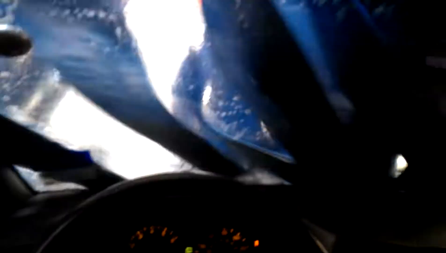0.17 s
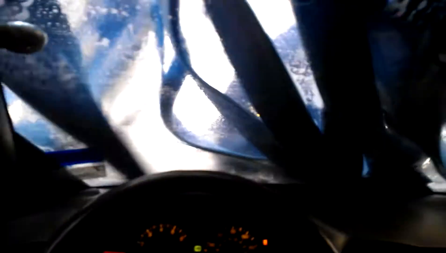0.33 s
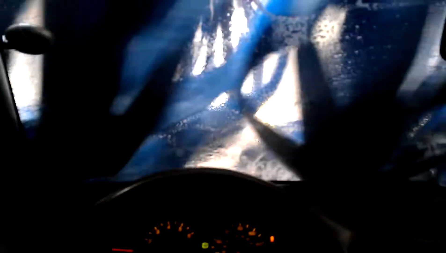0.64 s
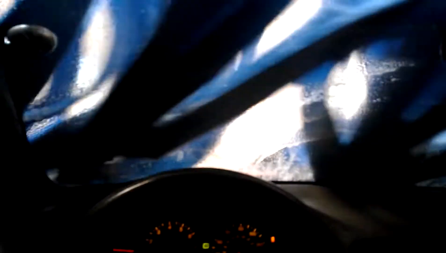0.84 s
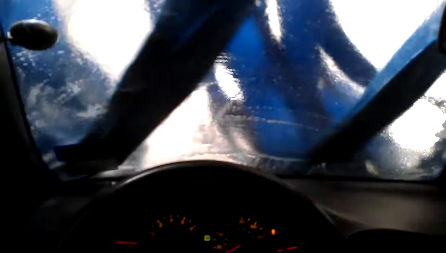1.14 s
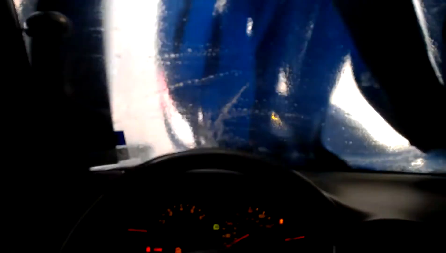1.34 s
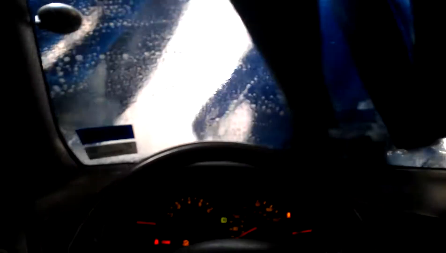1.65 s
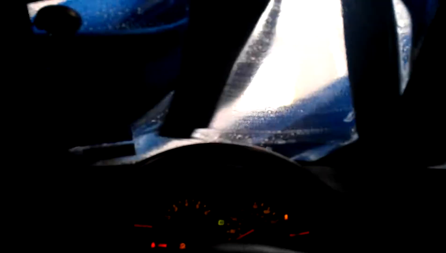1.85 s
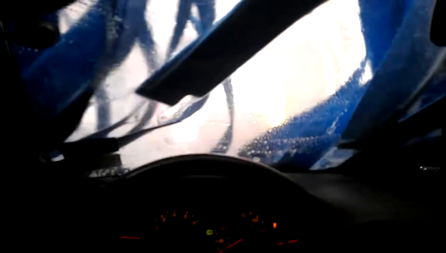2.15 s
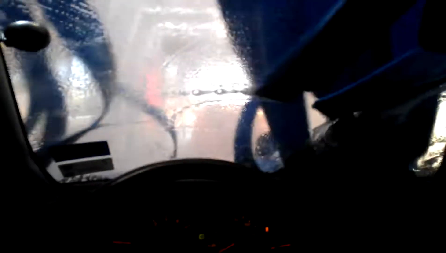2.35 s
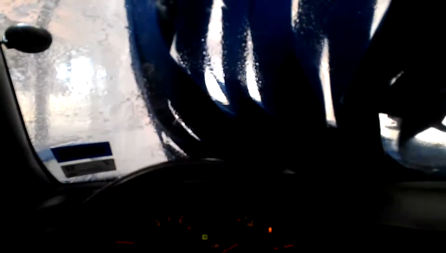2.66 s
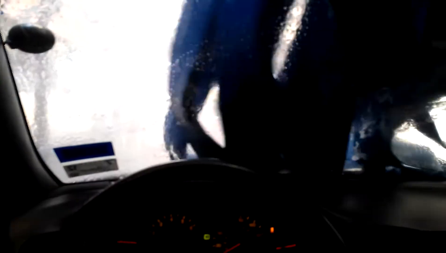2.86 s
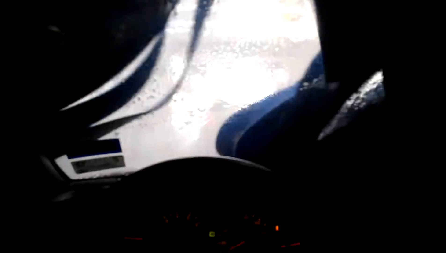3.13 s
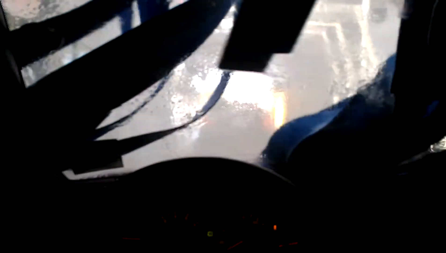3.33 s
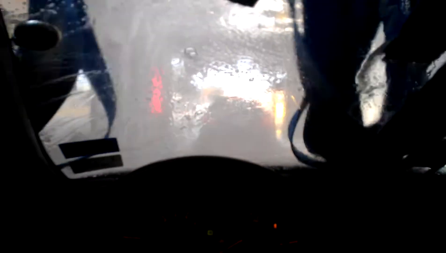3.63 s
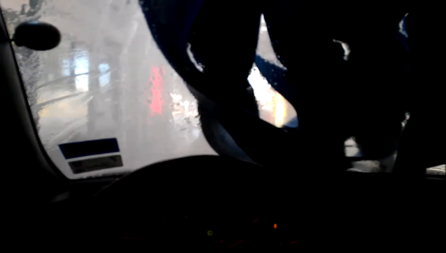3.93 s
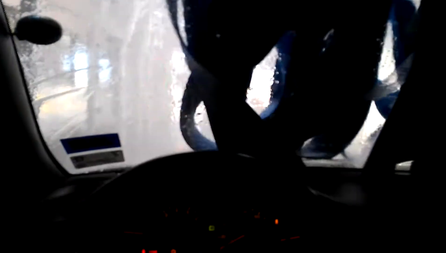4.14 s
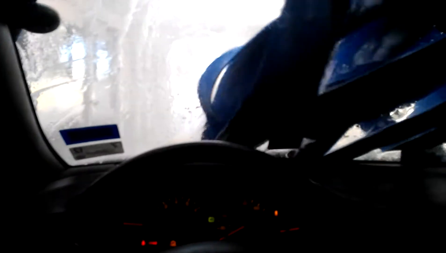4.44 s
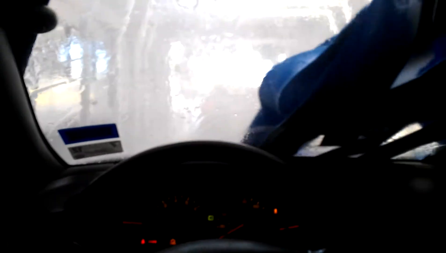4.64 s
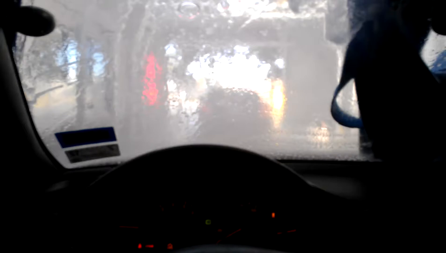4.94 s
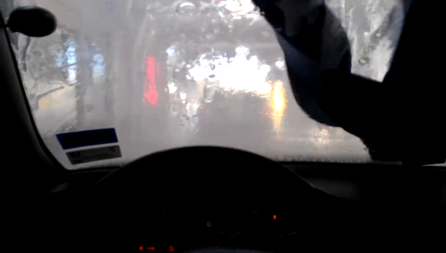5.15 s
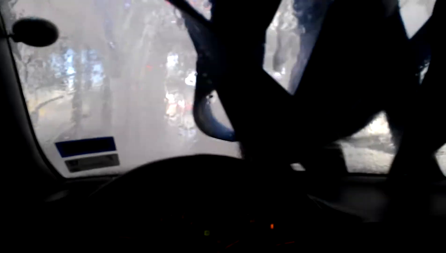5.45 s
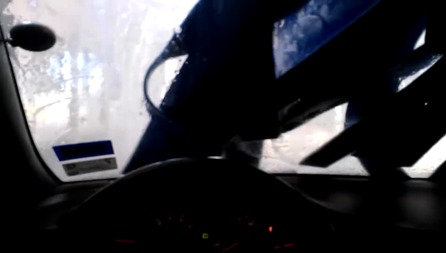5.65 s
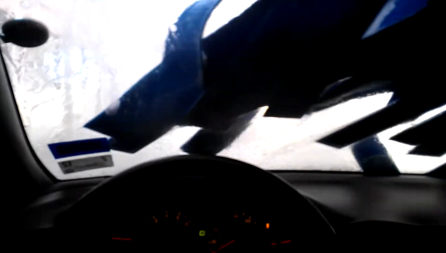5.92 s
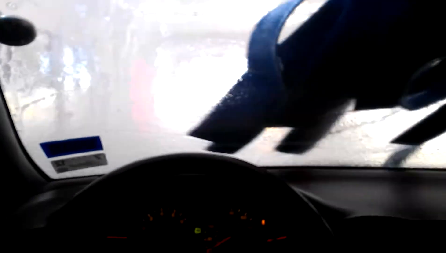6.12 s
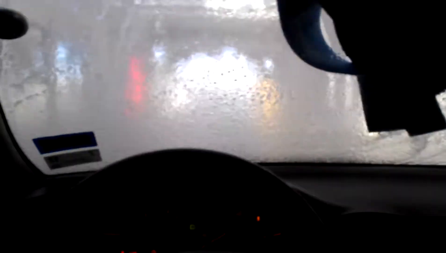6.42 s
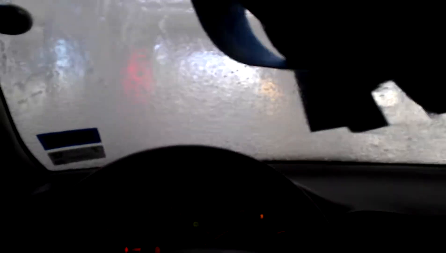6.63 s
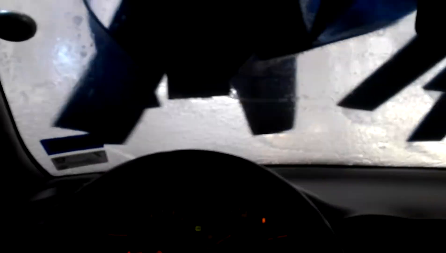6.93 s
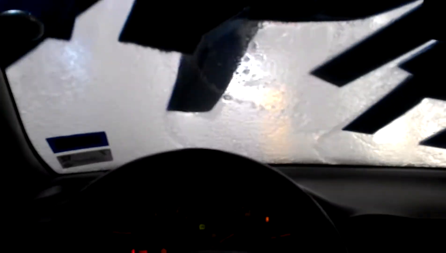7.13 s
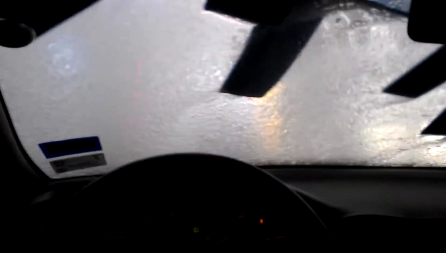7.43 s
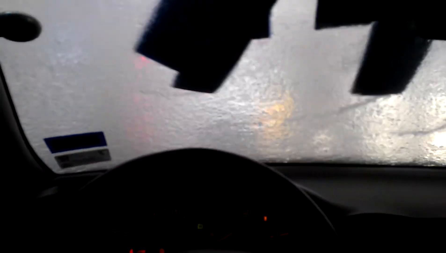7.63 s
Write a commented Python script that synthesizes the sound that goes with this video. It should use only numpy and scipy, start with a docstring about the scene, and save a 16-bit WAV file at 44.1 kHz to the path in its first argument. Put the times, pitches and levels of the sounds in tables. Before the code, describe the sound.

From the driver's seat in a tunnel car wash, wet cloth strips scrub and swish over panels and glass while fine spray hisses. Slaps start sparse and muffled, then crowd into hard, splashy blows near two and three seconds. Short squeaks skid on the glass. Later hits are looser and spray grows. A small recorder inside the cabin overloads and ducks on the hardest blows.

```python
"""Heavy wet slaps land all around the driver's seat in a tunnel car wash, over scrubbing, swish and spray.
Each slap is noise drumming on the car, a ringing struck spot and a burst of squeezed water.
Coloured grainy noise makes the cloth and water; gliding noise bands squeak, sagging low sines thud.
The hardest slaps overload the small recorder, whose gain ducks and creeps back."""
import sys
import numpy as np
from scipy import signal
from scipy.fft import rfft, irfft, next_fast_len
from scipy.io import wavfile
from scipy.ndimage import uniform_filter1d, map_coordinates

SR = 44100
rng = np.random.default_rng(int(sys.argv[2]) if len(sys.argv) > 2 else 0)


def inscribe(sig):
    """Save sig as 16-bit PCM at rate SR to the path in sys.argv[1].

    A 1-D sig is mono; a 2-D sig holds one channel per row.
    Samples are clipped to [-1, 1] before scaling.
    """
    pcm = np.round(np.clip(np.atleast_2d(sig).T, -1, 1) * 32767)
    wavfile.write(sys.argv[1], SR, pcm.astype(np.int16))


N = 343098

# the curtain's slow pressure on the car and the water it carries:
# (time [s], scrubbing level [dB], wet swish level [dB], spray level before its 2 dB lift [dB])
CURTAIN_LEVELS = [(0, -18, -20, -25.5), (.2, -22.5, -25, -31), (.6, -18.5, -26.5, -30),
                  (.8, -22, -27, -33.5), (1.2, -17.5, -26.5, -34), (1.45, -19, -29, -37.5),
                  (1.75, -15, -22, -34.5), (2.25, -21, -28, -42), (2.9, -16.5, -24, -37.5),
                  (3.6, -16.5, -24, -38.5), (4.5, -16, -22, -35.5), (5.4, -20, -24.5, -37),
                  (5.8, -20, -19.5, -33.5), (6.05, -18, -18.5, -28.5), (6.7, -21, -20, -27),
                  (7.15, -20.5, -20.5, -29.5), (7.45, -21.5, -18.5, -26.5), (7.78, -21, -21, -23.5)]


def amp(db):
    """Decibels to gain."""
    return 10 ** (np.asarray(db) / 20)


def unit(x):
    """Scale to rms 1."""
    return x / np.sqrt(np.mean(x ** 2) + 1e-20)


def along(points, hz):
    """(frequency [Hz], value) points read on a log frequency axis."""
    f, v = np.transpose(points)
    return np.interp(np.log(hz + 1), np.log(f + 1), v)


def curves(rows):
    """One value per sample for each column after the time."""
    s, *cols = np.transpose(rows)
    return [np.interp(np.arange(N) / SR, s, c) for c in cols]


def wobble(rate):
    """A smooth random curve, rate knots a second."""
    knots = rng.standard_normal(int(N * rate / SR) + 4)
    return map_coordinates(knots, [np.arange(N) * rate / SR])


def bump(hz, centre, width):
    """Bell shape of a resonance, 1 at its centre and 1/2 at the edges of its width."""
    return 1 / (1 + (2 * (hz - centre) / width) ** 2)


def cabin(hz):
    """Lift in dB that the resonances of the panels and the cabin give each frequency."""
    # resonances of panels and cabin: (frequency [Hz], width [Hz], lift [dB])
    resonances = [(256, 40, 2.5), (363.2, 94, 7.5), (527.6, 54, 7.5), (782, 244, 8), (1030, 102, 7),
                  (1876, 130, 22)]
    return sum(db * bump(hz, centre, width) for centre, width, db in resonances)


def heard(pair, colour):
    """Two unrelated drives ring through a causal colour (dB of Hz), reach two ports, mid at rms 1."""
    # likeness of the two microphone ports: (frequency [Hz], likeness [clipped to -1..1])
    port_likeness = [(100, 1.6), (300, 0.67), (600, 0.87), (1100, 0.2), (2500, 0.15), (8000, 0.34)]
    # tilt between the ports: (frequency [Hz], left minus right [dB])
    port_lean = [(60, 2.7), (110, 6.5), (190, 7), (330, 3.3), (590, 8.2), (1040, 5.1), (1830, 2.7),
                 (3240, 7.2), (5720, 6.1), (10100, 6.2)]
    n = pair.shape[1]
    m = 2 * next_fast_len(n // 2 + 4096)
    hz = np.fft.rfftfreq(m, 1 / SR)

    # folding the cepstrum makes the colour minimum-phase: nothing rings ahead of its drive
    cepstrum = irfft(np.log(amp(colour(hz)) + 1e-6))
    cepstrum[1:m // 2] *= 2
    cepstrum[m // 2 + 1:] = 0
    response = np.exp(rfft(cepstrum))

    # the balance of mid and side sets the likeness
    turn = np.arccos(np.clip(along(port_likeness, hz), -1, 1)) / 2
    mid, side = rfft(pair, m) * response * [np.cos(turn), np.sin(turn)]
    lean = amp(along(port_lean, hz) / 2)
    ports = irfft([(mid + side) * lean, (mid - side) / lean], m)[:, :n]
    return ports / np.sqrt(np.mean(ports.mean(0) ** 2) + 1e-20)


def grains(rate, spread_db, share):
    """Tiny contacts, rate a second, of uneven size over smooth noise; share is their part of the power."""
    sizes = amp(spread_db * np.clip(rng.standard_normal(N), -2, 2))
    ticks = (rng.random(N) < rate / SR) * sizes
    ticks = unit(ticks * rng.standard_normal((2, N)))
    smooth = rng.standard_normal((2, N))
    share = np.clip(share, 0, 1)
    return np.sqrt(share) * ticks + np.sqrt(1 - share) * smooth


def patchy(pair, depth_db):
    """The colour shifts from moment to moment as the contact wanders."""
    z = signal.stft(pair, nperseg=512)[2]
    field = rng.standard_normal(z.shape[1:])
    field = uniform_filter1d(field, size=7, axis=0)  # blur over frequency
    field = uniform_filter1d(field, size=10, axis=1)  # blur over time
    return signal.istft(z * amp(depth_db * unit(field)), nperseg=512)[1][:, :N]


def wipes():
    """Lift in dB as bundles of strips wipe across the car, each a smooth bell-shaped swell."""
    # passing bundles: (time at the height [s], width at 61 % of the lift [s], lift [dB])
    swells = [(0.408, 0.096, 3.5), (1.14, 0.088, 2.5), (2.46, 0.16, 4.5), (4.774, 0.042, 5),
              (6.635, 0.075, 1.5), (7.342, 0.088, 4)]
    t = np.arange(N) / SR
    return sum(db * np.exp(-2 * ((t - s) / length) ** 2) for s, length, db in swells)


def water():
    """Fine drops spatter on the windscreen; a jet adds a narrow, wavering hiss and fades as it is passed."""
    # spectrum shape of the spray: (frequency [Hz], density [dB per Hz])
    spray_shape = [(60, -59), (2500, -6), (4200, 1.5), (5200, 2.5), (6200, 4), (7800, -1), (8900, 3),
                   (9700, -4.5), (10500, -18), (11300, -51)]
    # jet on the glass, fading as the car rolls past it: (time [s], level [dB])
    jet_levels = [(0, -24), (.2, -29.5), (.45, -26.5), (.9, -36), (1.8, -35), (2.3, -58), (7.78, -73)]
    spray_db = curves(CURTAIN_LEVELS)[2] + .5 * wipes()
    jet_db = curves(jet_levels)[0]

    def spray_colour(hz):
        return along(spray_shape, hz)

    def jet_colour(hz):
        nozzle = bump(hz, 3770, 240) + 0.35 * bump(hz, 4400, 700)
        return along(spray_shape, hz) + 20 * np.log10(nozzle)

    spray = heard(grains(rate=2000, spread_db=-4.5, share=0.15), spray_colour)
    jet = heard(patchy(rng.standard_normal((2, N)), depth_db=2.5), jet_colour)
    spray = spray * amp(spray_db + 2.0 + 1.32 * wobble(30))
    return spray + jet * amp(jet_db + 2.6 * wobble(16.0))


def flaps():
    """Strip ends flutter unevenly, rms 1: random catches with a quick rise and a slower fall."""
    flaps_per_s, rise_s, decay_s = 40, 0.0013, 0.064
    flutter = (rng.random(N) < flaps_per_s / SR) * rng.uniform(0.24, 1, N)
    flutter = flutter - flutter.mean()
    for seconds in (rise_s, decay_s):
        flutter = signal.lfilter([1], [1, -np.exp(-1 / (seconds * SR))], flutter)
    return unit(flutter)


def cloth():
    """Cloth sticks and slips on the panels as grainy noise; its wet face swishes over the glass."""
    # spectrum shapes of scrubbing and of wet swish: (frequency [Hz], density [dB per Hz])
    scrub_shape = [(25, -69), (70, -52), (110, -36), (160, -21.5), (220, -12), (260, -1.5), (330, 0),
                   (460, 2.5), (630, -2), (950, -3), (1200, -9), (1600, -18.5), (3500, -76.5)]
    swish_shape = [(60, -64), (500, -9), (1100, 3), (1500, 0.5), (2150, 3.5), (2900, -2), (4100, -1.5),
                   (5200, -12.5), (8000, -41), (12000, -74.5)]
    scrub_db, swish_db, _ = curves(CURTAIN_LEVELS)
    flutter, lift_db = flaps(), wipes()
    rubbing = patchy(grains(rate=260, spread_db=-1.5, share=0.18), depth_db=2.0)
    scrub = heard(rubbing, lambda hz: along(scrub_shape, hz) + cabin(hz))
    sliding = patchy(grains(rate=900, spread_db=1.5, share=0.12), depth_db=1.33)
    swish = heard(sliding, lambda hz: along(swish_shape, hz))
    scrub = scrub * amp(scrub_db + lift_db + 1.3 * flutter)
    return scrub + swish * amp(swish_db + 0.83 * lift_db + 1.38 * flutter)


def contact(t, length, rise, fall):
    """Force of a strip that brushes, lands at t = 0, lays itself down over its length, then lets go."""
    after = np.maximum(t, 0)
    brush = 0.4 * np.exp(np.minimum(t, 0) / 0.0041)
    landing = 1 - np.exp(-after / rise)
    release = np.exp(-after / length / 2 - np.maximum(t - length, 0) / fall)
    return np.maximum(brush, landing) * release


def strokes(rows, voice):
    """Sum of short stereo sounds; voice(t, length, ...) plays one, with t = 0 at its row's time."""
    lead, size = SR // 40, SR // 6
    t = (np.arange(size) - lead) / SR
    out = np.zeros((2, N + size))
    for s, length, *rest in rows:
        length = max(length, .004)
        start = round(s * SR) - lead
        # levels hold over the length of the contact
        out[:, start:][:, :size] += voice(t, length, *rest) * np.sqrt(length * SR / size)
    return out[:, :N]


def thud(t, length, db):
    """A low thud under a slap, probably the recorder overloading: swings sag from 143 towards 58 Hz."""
    after = np.maximum(t, 0)
    swings = np.cumsum(58 + 85 * np.exp(-after / 0.019)) / SR
    swell = after ** 2 * np.exp(-after / 0.006)
    return amp(db) * unit(np.sin(2 * np.pi * swings) * swell) * amp([[3], [-3]])


def skid(t, length, db, first_hz, last_hz):
    """A strip skids on the wet glass: a short, hoarse, gliding squeak of narrow-band noise."""
    phase = 2 * np.pi * np.cumsum(np.interp(t, [0, length], [first_hz, last_hz])) / SR
    # uneven slips smear the pitch into a band, wider for higher squeaks
    smear_hz = 0.14 * first_hz
    slips = signal.lfilter(*signal.butter(2, smear_hz, fs=SR), rng.standard_normal((2, len(t))))
    squeak = slips[0] * np.sin(phase) + slips[1] * np.cos(phase)
    squeak = squeak * contact(t, length, rise=0.0014, fall=0.0012)
    return amp(db) * unit(squeak) * amp([[2], [-2]])


def slap(t, length, body_db, smack_db, spot_hz):
    """A strip drums on the car, rings the struck spot and squeezes out a smack of water."""
    # spectrum shapes of a slap's body and its wet smack: (frequency [Hz], density [dB per Hz])
    body_shape = [(25, -64.5), (90, -46.5), (150, -27), (220, -16), (330, 2.5), (600, -1.5), (950, -2),
                  (1300, -5), (2000, -48), (4500, -34.5), (12000, -69)]
    smack_shape = [(60, -63), (600, -23), (1300, 6), (1950, 5.5), (3000, -4.5), (4100, -4.5), (5500, -14.5),
                   (9000, -17), (11000, -45), (16000, -74)]
    light_db, heavy_db, flex_db = -13, 3.5, 3  # body levels for heaviness 0 and 1; lift at heaviness 1
    noise = rng.standard_normal((2, 2, len(t)))
    # folds of the cloth hit one after another
    folds = amp(0.98 * unit(uniform_filter1d(rng.standard_normal(len(t)), size=130)))
    press = contact(t, length, rise=0.00071, fall=0.025)

    # a heavy blow flexes the whole panel and brings out its deepest resonance
    heavy = np.clip((body_db - light_db) / (heavy_db - light_db), 0, 1)

    def drum_colour(hz):
        spot = 5 * bump(hz, spot_hz, .5 * spot_hz)
        flex = flex_db * heavy * bump(hz, 236, 110)
        return along(body_shape, hz) + cabin(hz) + spot + flex

    drum = heard(noise[0] * folds * press, drum_colour)

    # the spot rings with an unsteady pitch while the strip presses on it
    drift = np.cumsum(rng.standard_normal(len(t))) * 0.013
    ring = unit(np.sin(2 * np.pi * spot_hz * t + drift) * press) * amp([[2.2], [-2.2]])

    # every pocket of trapped water has its own colour
    pocket_hz = 1950 * np.exp(0.52 * rng.standard_normal())
    crackle = amp(1.2 * unit(uniform_filter1d(rng.standard_normal(len(t)), size=60)))
    splash = folds * crackle * contact(t, length, rise=0.0006, fall=0.02)
    smack = heard(noise[1] * splash, lambda hz: along(smack_shape, hz) + 4 * bump(hz, pocket_hz, 700))
    return amp(body_db) * (drum + 0.48 * ring) + amp(smack_db) * smack


def scene():
    """Everything heard at the driver's seat, from the background to the slaps."""
    # low thuds under some slaps, probably from recorder overload, strong or faint:
    # (time [s], level [dB])
    thud_rows = [(.107, -47.5), (0.63, -53), (1.364, -47), (1.807, -23), (2.03, -45), (2.458, -30),
                 (2.668, -24), (3.192, -16), (3.981, -26), (4.267, -23), (4.555, -49), (5.341, -43),
                 (6.218, -18), (6.715, -44), (6.928, -37), (7.697, -42)]
    # wet cloth skidding on the glass:
    # (time [s], length [s, at least 0.004], level [dB], first pitch [Hz], last pitch [Hz])
    skid_rows = [(.464, 0.038, -19.5, 1473, 1250), (3.228, 0.025, -14, 2310, 1780),
                 (3.712, .01, -22, 2340, 2420), (3.778, .018, -14, 1220, 1240),
                 (3.86, 0.0085, -17, 1026, 1370), (3.9, 0.013, -25, 2930, 1830),
                 (4.019, 0.03, -18, 793, 1120), (4.352, 0.021, -19, 2000, 2630),
                 (5.548, 0.031, -11.5, 2773, 1574)]
    # strips landing: (time [s], contact length [s, at least 0.004], body level [dB],
    # wet smack level [dB], pitch of the struck spot [Hz])
    slap_rows = [(.107, 0.0082, -6.5, -32, 823), (.462, 0.0066, -12.5, -18, 1320),
                 (.582, .009, -12, -32, 700), (.632, 0.023, -8, -17.5, 734), (.736, 0.0089, -22, -18, 1300),
                 (.885, 0.027, -10, -23.5, 394), (1.163, 0.0076, -12.5, -24, 850),
                 (1.221, 0.013, -5.5, -23, 777), (1.285, 0.0098, -10, -40, 798),
                 (1.364, 0.012, -8, -43, 834), (1.66, 0.023, -15, -33, 332), (1.786, 0.0033, -5, -14, 996),
                 (1.809, 0.016, 0.5, -8, 720), (1.836, .013, 8, 3, 723), (1.934, 0.022, -5.5, -19, 698),
                 (1.957, 0.041, -4, -13, 834), (1.99, 0.016, -3, -14, 352), (2.028, 0.019, 4, -10.5, 391),
                 (2.172, 0.021, -7.5, -21, 606), (2.428, .012, -9.5, -36, 480),
                 (2.46, 0.016, 0.5, -21, 373), (2.498, 0.025, 0.5, -15, 424), (2.671, 0.021, 7, -1, 382),
                 (2.957, 0.023, -3, -17.5, 784), (3.05, 0.0053, -4.5, -7.5, 835),
                 (3.187, 0.029, -1, -30, 352), (3.201, 0.016, 6.5, 5, 860), (3.23, 0.033, -4.5, -12, 585),
                 (3.265, 0.0081, 1, -7, 408), (3.493, 0.027, -2.5, -12.5, 710),
                 (3.73, 0.019, -3, -16.5, 382), (3.82, .009, -4, -17, 557), (3.982, 0.023, 1.5, -4.5, 887),
                 (4.268, .034, 0, -9.5, 618), (4.366, 0.0095, -5, -13.5, 768),
                 (4.555, .019, -2.5, -12, 371), (4.775, 0.039, -13.5, -36, 395),
                 (4.959, 0.032, -14, -29, 403), (5.035, 0.022, -15, -17, 1070),
                 (5.277, 0.022, -7, -24, 1033), (5.341, 0.02, -7, -24, 560), (5.55, 0.012, -6.5, -11, 1050),
                 (5.682, 0.026, -6.5, -13, 776), (5.97, 0.024, -11.5, -19.5, 753),
                 (6.168, 0.0058, -6.5, -26, 350), (6.218, 0.015, 0, -14, 717),
                 (6.238, 0.016, 3.5, -23, 277), (6.328, 0.0085, -6, -26, 393),
                 (6.385, 0.021, -8.5, -16, 743), (6.716, 0.0074, -3.5, -14.5, 775),
                 (6.91, 0.022, -7.5, -17, 850), (6.929, 0.032, -3, -10.5, 900),
                 (7.027, 0.014, -4, -11, 722), (7.435, 0.018, -11.5, -40, 514),
                 (7.555, .024, -3.5, -26, 632), (7.697, 0.017, -1, -14, 515)]
    thud_s = 0.017  # span over which a thud's level is reckoned
    thuds = strokes([(s, thud_s, db) for s, db in thud_rows], thud)
    return water() + cloth() + thuds + strokes(skid_rows, skid) + strokes(slap_rows, slap)


def gain_control(x, limit_db, attack, release):
    """The gain drops quickly when the level passes the limit and recovers slowly; times in seconds."""
    power = np.abs(uniform_filter1d(np.max(x ** 2, axis=0), size=220))
    over_db = np.maximum(10 * np.log10(power + 1e-12) - limit_db, 1e-9)
    # a running maximum on a tilted log scale holds each peak and lets it decay exponentially
    age = np.arange(N) / SR / release
    held_db = np.exp(np.maximum.accumulate(np.log(over_db) + age) - age)
    lag = np.exp(-1 / (attack * SR))
    return x * amp(-signal.lfilter([1 - lag], [1, -lag], held_db))


def record(dry):
    """Gain control, rounded clipping of what slips past it, a low cut and the band limit."""
    low_cut_hz, top_hz = 86, 15800
    x = gain_control(dry, limit_db=-3.5, attack=0.015, release=0.18)
    x = x / (1 + (x / .96) ** 14) ** (1 / 14)
    m = next_fast_len(N + SR // 2)
    hz = np.fft.rfftfreq(m, 1 / SR)
    low_cut = hz ** 2 / np.hypot(hz ** 2, low_cut_hz ** 2)
    return irfft(rfft(x, m) * low_cut * (hz < top_hz), m)[:, :N]


dry = scene()
out = record(dry)
inscribe(out)
```